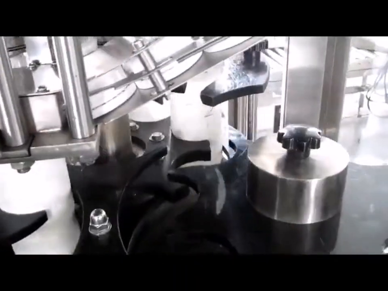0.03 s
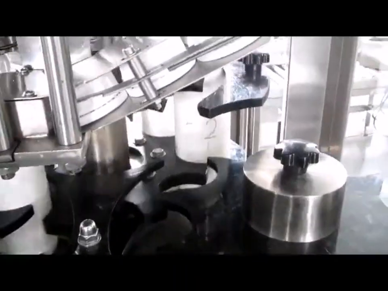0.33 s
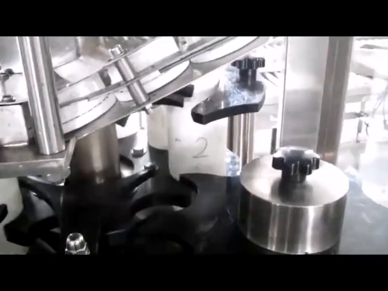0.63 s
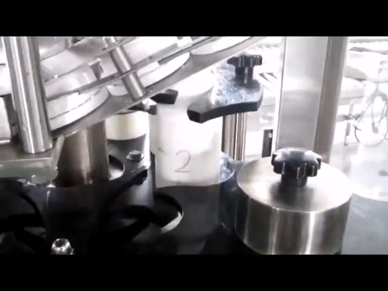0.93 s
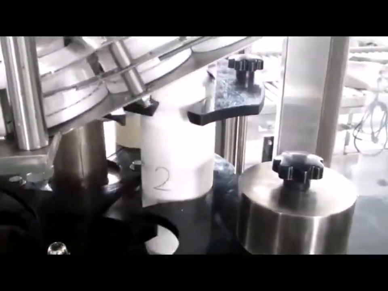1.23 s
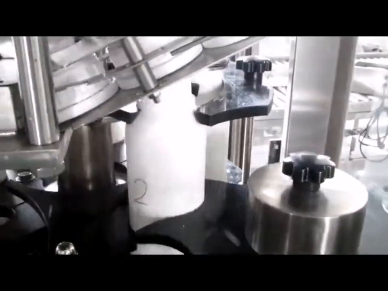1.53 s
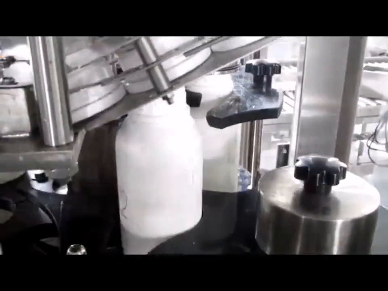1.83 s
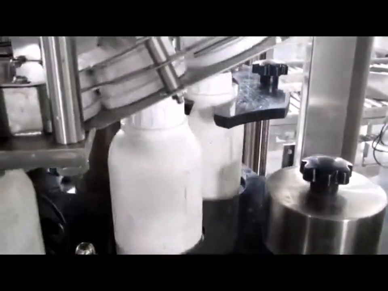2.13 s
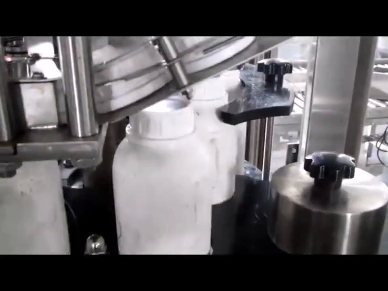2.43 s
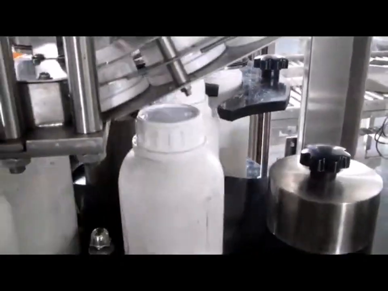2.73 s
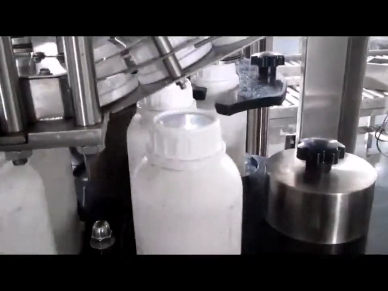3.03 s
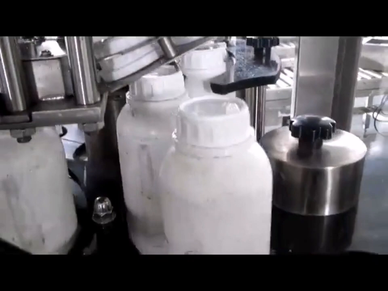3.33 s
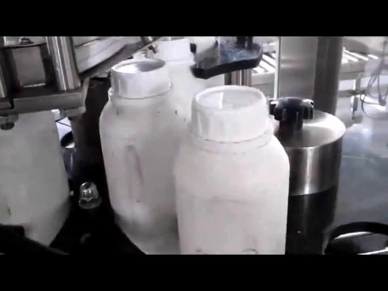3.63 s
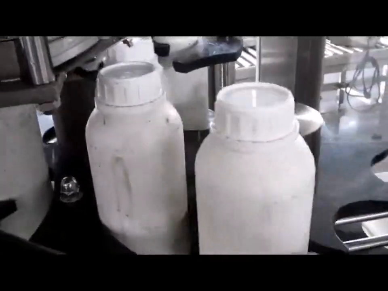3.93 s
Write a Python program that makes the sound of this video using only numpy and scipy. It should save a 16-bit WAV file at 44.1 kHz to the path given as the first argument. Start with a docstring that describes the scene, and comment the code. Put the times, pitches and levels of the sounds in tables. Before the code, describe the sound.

A bottle filling and capping machine rattles steadily up close in a factory hall. Plastic bottles clack against the guides and now and then knock hollowly, while conveyors churn and hiss underneath.

```python
"""Bottle filling and capping machine

In a factory hall a turning mechanism chatters about fifteen times a second. Each beat is a short
scrape of tiny contacts that excites the modes of the steel frame. Plastic bottles clack against
the guides and now and then boom as hollow resonators. Underneath, drive and conveyors churn,
far bottles clatter, and sliding ones hiss by friction."""
import sys
import numpy as np
from scipy import signal
from scipy.fft import rfft, irfft
from scipy.io import wavfile

SR = 44100
rng = np.random.default_rng(int(sys.argv[2]) if len(sys.argv) > 2 else 0)


def wav_out(sig):
    """Save sig, one row per channel (or a flat mono array), as 16-bit PCM at SR to the path in sys.argv[1]."""
    wavfile.write(sys.argv[1], SR, np.round(np.clip(np.atleast_2d(sig).T, -1, 1) * 32767).astype(np.int16))


N = 176400
BURST = 8192  # samples in one short sound

# Levels are relative: each source adds its own gain.
# Loudness curves of the steady sources: time_s, level_db
CHURN_LEVEL = [(0.0, -26.5), (0.43, -26.5), (0.53, -25.5), (1.22, -30), (1.54, -35), (1.96, -32.5),
               (2.27, -32), (2.64, -30), (2.86, -31.5), (3.34, -33.5), (3.72, -32.5), (4.0, -33.5)]
FAR_CLATTER_LEVEL = [(0.0, -27), (0.42, -28.5), (0.78, -25.5), (1.34, -29.5), (1.65, -27.5), (2.29, -34.5),
                     (2.72, -34.5), (3.23, -34.5), (3.35, -39), (3.64, -31.5), (3.73, -34), (3.89, -39),
                     (4.0, -31.5)]
HISS_LEVEL = [(0.0, -37), (0.43, -41), (0.73, -32), (0.89, -39), (1.01, -40.5), (1.3, -40), (1.7, -32),
              (1.94, -35), (2.12, -40), (2.24, -45), (2.47, -47), (3.26, -38), (3.4, -38.5), (3.64, -36),
              (3.7, -33.5), (4.0, -44.5)]
# Spectra of the churning and of a contact's three bands: frequency_hz, gain_db
CHURN_SPECTRUM = [(25, -12), (50, -19.5), (85, -8), (120, -17), (160, -10), (200, -4), (275, 0.5),
                  (330, -4), (490, 3.5), (530, -7.5), (590, 6), (800, 3.5), (1150, -2), (1600, -5),
                  (2500, -8.5), (3700, -13.5), (4300, -18), (8000, -30)]
LOW_SPECTRUM = [(50, -40), (110, -22), (200, -7.5), (280, -1.5), (450, 11), (620, 9.5), (1000, 8.5),
                (1400, -2.5), (2500, -51)]
MID_SPECTRUM = [(600, -37), (1100, 6), (1900, 7.5), (2900, 1.5), (3400, 2), (3950, -1), (4200, -36),
                (7000, -35)]
TREBLE_SPECTRUM = [(2800, -58), (4000, 9.5), (4500, 5.5), (5200, 11.5), (5900, 10), (6600, 3), (7400, 10.5),
                   (8000, -13)]
# Beats of the mechanism: start_s, length_s, level_db, low_db, ring_db, treble_db (last three re level)
BEATS = [(0.053, 0.0034, -24, 6, -32.5, -5.5), (0.123, 0.012, -27.5, 1, -18, -9),
         (0.191, 0.019, -32, 8.5, -10, -18), (0.317, 0.017, -25, -14.5, -29, -17),
         (0.384, 0.013, -26.5, 5.5, -11, -17), (0.579, 0.014, -24.5, 1.5, -9, -8.5),
         (0.647, 0.0072, -26.5, -9, 2.5, -19), (0.719, 0.02, -24.5, 3.5, -5.5, -11.5),
         (0.78, 0.005, -25, -7, 5, -8), (0.849, 0.0063, -25, -10, 4, -30),
         (0.909, 0.0046, -26.5, -3, 8, -27), (0.979, 0.013, -28, -9, 2.5, -7.5),
         (1.042, 0.008, -28, 4, 6, -5), (1.114, 0.0061, -31.5, 1, 5, -8),
         (1.18, 0.0099, -29, -5, 3.5, -10.5), (1.236, 0.012, -23.5, 1, -6, -7),
         (1.32, 0.0072, -27.5, -7, -2, -11), (1.377, 0.008, -23.5, -26, 2.5, -11.5),
         (1.447, 0.0052, -22.5, -2, 4, -12), (1.513, 0.0063, -21, -5.5, -4.5, -11.5),
         (1.58, 0.0064, -20.5, -20, -14, -16.5), (1.687, 0.0044, -19.5, -2, -7, -8),
         (1.748, 0.0082, -20, 0, -10, -9), (1.813, 0.0062, -23, -6, -14, -9.5),
         (1.88, 0.021, -29.5, -13, -24, -22), (1.949, 0.011, -30, -13, 0, -3.5),
         (2.018, 0.02, -23.5, -18, -11, -4), (2.444, 0.0068, -24, 9.5, -17, -8.5),
         (2.505, 0.02, -28, -5, -9, -14), (2.579, 0.01, -26, -11, -2, -11.5),
         (2.647, 0.0105, -22, -2.5, -2, -15), (2.717, 0.014, -20.5, -6, 0, -10.5),
         (2.782, 0.012, -20, -17, -0.5, -12), (2.839, 0.014, -25, -20, -10, -9.5),
         (2.913, 0.0068, -27.5, 1, 1, -1), (2.976, 0.015, -25, 0, -8, -8),
         (3.048, 0.0033, -21, 0.5, -21, -13), (3.109, 0.0079, -19, -1, -14, -13),
         (3.187, 0.0068, -21, -9, 1.5, -4.5), (3.258, 0.04, -25.5, -2.5, -6.5, -8),
         (3.329, 0.0058, -22, 3.5, -9, -32), (3.395, 0.011, -22, -17, -6.5, -16),
         (3.445, 0.027, -24, -10.5, -11, -6.5), (3.532, 0.0087, -22.5, -6, -3.5, -10),
         (3.595, 0.018, -28.5, -6, -3.5, -9), (3.664, 0.015, -25.5, -20, -8.5, -12),
         (3.731, 0.015, -23, -3, -10, -12), (3.791, 0.012, -24, 5, -13.5, -11.5),
         (3.873, 0.022, -28.5, -2, -18, -8.5), (3.943, 0.022, -32, -36, 3, -0.5)]
# Bottles striking the guides: start_s, length_s, level_db, low_db, treble_db (last two re level)
CLACKS = [(0.132,0.0094,-27,16.5,-21), (0.213,0.0037,-23.5,8,-6), (0.224,0.011,-26,13.5,-6.5),
          (0.363,0.024,-22,-1,-10), (0.388,0.011,-22,5.5,-10.5), (.618,0.012,-18,6.5,-22),
          (0.651,0.0066,-22.5,7,-7.5), (0.753,0.011,-19,5.5,-10), (0.83,0.0048,-21,-6.5,-5),
          (1.026,0.0079,-20,4,-11.5), (1.214,.005,-21.5,1.5,-11), (1.43,0.0048,-24.5,-17,-13),
          (1.492,0.0057,-22.5,2,-18.5), (1.553,0.0064,-23.5,-13,-23), (1.619,0.0069,-19.5,-21,-14),
          (2.125,0.0017,-15.5,-23,-2.5), (2.255,0.0045,-24,11,-20), (2.299,0.016,-27.5,8,-8.5),
          (2.477,0.0068,-29,12.5,-20), (2.791,0.0073,-25,3,-19), (3.12,0.014,-19,4.5,-10.5),
          (3.285,0.0025,-16,-10,-3.5), (3.421,0.0047,-26.5,1,1.5), (3.491,0.0053,-20.5,0,-3.5),
          (3.761,0.022,-21,2,-5), (3.953,0.0045,-16,-13,-7)]
# Modes of the frame and of the steel ring: pitch_hz, level_db, t60_s
FRAME_MODES = [(642, -6, 0.1), (972.5, 5, 0.068), (1317, 5, 0.095), (2002, -3, 0.064), (2780, -6.5, 0.04),
               (3020, -3, 0.023)]
RING_MODES = [(2733, -10, 0.06), (2890, -10.5, .022), (3516, -7, 0.027), (3670, -1.5, 0.042)]
# Hollow resonances of bumped bottles: start_s, pitch_hz, level_db, rise_s, t60_s
BOOMS = [(.056,1774,-13,0.0016,0.034), (.128,754,-21,.008,.12), (.226,615,-28,.008,.12),
         (.228,1110,-23,.005,.07), (.358,488,-35,.014,.14), (.392,1150,-21.5,.005,0.061),
         (0.585,341,-23,0.0093,0.16), (0.618,1180,-17.5,.003,.064), (.62,683,-26,0.0037,0.099),
         (.767,1647,-25,0.015,.084), (1.027,1600,-20.5,0.0039,0.062), (1.237,1130,-16,0.0049,.07),
         (1.24,957,-20.5,0.0099,0.15), (1.621,2840,-17,0.0026,0.042), (2.301,1150,-17.5,0.0025,.09),
         (2.312,697,-27,0.0064,0.12), (2.426,631,-20,0.016,0.19), (2.479,1180,-12.5,0.0019,0.031),
         (2.479,1580,-20,0.0043,.072), (2.481,601,-20.5,0.0087,0.21), (2.515,292,-24,0.02,0.071),
         (2.796,1568,-10.5,0.0062,0.058), (3.111,1136,-14,0.0089,0.053), (3.866,571,-14.5,.023,0.21),
         (3.89,299,-23,.014,.16), (3.895,410,-25,.014,0.11)]
# Stereo width: frequency_hz, side_gain_db
WIDTH = [(60, -26), (150, -30), (300, -25), (600, -18), (1000, -14.5), (1600, -9.5), (2800, -11.5),
         (4000, -9), (5000, -5), (7400, -3)]
# Stereo balance: frequency_hz, left_minus_right_db
LEAN = [(1400, 0), (2800, -.9), (5500, -1.5), (8000, -3)]

ATTACK_S, RELEASE_S, TAIL_DB, TAIL_S = 0.002, 0.005, -9, 0.018  # envelope of a blow
REBOUND_WAIT_S, REBOUND_DECAY_S, REBOUND_DB = 0.0056, 0.0056, -2.5
BEAT_DB, CLACK_DB = 0.5, -3
LOW_DB, MID_DB, TREBLE_DB = -7, -0.5, 0.5


def from_db(db):
    """Amplitude grows tenfold with every 20 decibels."""
    return 10 ** (np.asarray(db) / 20)


def unit_rms(x):
    """Division by the rms gives a signal unit power."""
    return x / np.sqrt(np.mean(x ** 2) + 1e-20)


def over_time(points):
    """Linear interpolation gives a curve's value at every sample."""
    return np.interp(np.arange(N) / SR, *np.transpose(points))


def per_bin(points, size):
    """Interpolation in log frequency gives a spectrum's value at every bin."""
    hz, value = np.transpose(points)
    return np.interp(np.log(np.fft.rfftfreq(size, 1 / SR) + 1), np.log(hz), value)


def body(spectrum, size=2048):
    """A minimum-phase response, here of unit energy, follows from its magnitude spectrum."""
    cepstrum = irfft(np.log(from_db(per_bin(spectrum, size))))
    cepstrum[1:size // 2] *= 2
    cepstrum[size // 2 + 1:] = 0
    response = irfft(np.exp(rfft(cepstrum)))
    return response / np.linalg.norm(response)


def through(x, response):
    """A linear system convolves its input with its impulse response."""
    return signal.fftconvolve(x, np.atleast_2d(response), axes=-1)[:, :x.shape[-1]]


def lowpass(x, cutoff_hz):
    """A second-order filter falls 12 dB an octave above its cutoff."""
    return signal.sosfilt(signal.butter(2, cutoff_hz, fs=SR, output="sos"), x)


def cut_bass(x, cutoff_hz=122):
    """Parts much smaller than a wavelength radiate poorly."""
    return signal.sosfilt(signal.butter(2, cutoff_hz, "high", fs=SR, output="sos"), x)


def mode(hz, t60):
    """A damped mode rings as an exponentially decaying sine, here of unit energy."""
    t = np.arange(BURST) / SR
    response = np.sin(2 * np.pi * hz * t) * from_db(-60 * t / t60)
    return response / np.linalg.norm(response)


def contacts(per_s, spread_db, size=N):
    """Independent tiny impacts form shot noise: a centre row and a side row, at unit rms."""
    shape = (2, size)
    strength = from_db(spread_db * np.minimum(rng.exponential(1, shape), 3))
    polarity = rng.choice([-1, 1], shape)
    return unit_rms(strength * polarity * (rng.random(shape) < per_s / SR))


def add(track, start_s, sound):
    """Sounds combine by superposition, each from its own start."""
    i = max(int(start_s * SR), 0)
    track[:, i:i + sound.shape[-1]] += sound[:, :max(N - i, 0)]


def churn(knocks_per_s=110, mode_count=24, t60_cycles=28):
    """Dense impacts of drive and conveyors merge into dull noise; jostling bottles ring hollowly."""
    grains = contacts(per_s=3000, spread_db=0)
    drive = through(grains, body(CHURN_SPECTRUM, size=8192))
    knocks = np.zeros((2, N))
    for hz in np.geomspace(253.5, 1340, mode_count):
        impacts = contacts(knocks_per_s / mode_count, spread_db=0.9)
        knocks += np.sqrt(hz) * through(impacts, mode(hz, t60_cycles / hz))
    jostling = from_db(-5) * cut_bass(unit_rms(knocks))
    return from_db(over_time(CHURN_LEVEL) + 0.5) * (drive + jostling)


def far_clatter():
    """Collisions of far bottles add up to a fine, gritty shot noise."""
    grains = contacts(per_s=1200, spread_db=1.5)
    return from_db(over_time(FAR_CLATTER_LEVEL) - 3.5) * through(grains, body(MID_SPECTRUM))


def sliding_hiss(flutter_db=4):
    """Sliding friction of bottles makes treble noise of uneven strength."""
    flutter = unit_rms(lowpass(rng.standard_normal(N), cutoff_hz=25))
    friction = through(rng.standard_normal((2, N)), body(TREBLE_SPECTRUM))
    return from_db(over_time(HISS_LEVEL) - 5.5 + flutter_db * flutter) * friction


def ticks(per_s=22, length_s=0.0063, level_db=-35.5, low_db=-2.5, treble_db=-16.5, slots=400):
    """Loose small parts tick as a random process, listed here as faint blows."""
    draws = rng.random((slots, 2))
    scatter_db = 2 * rng.standard_normal(slots)
    return [(when * N / SR, length_s, level_db - drop_db, low_db, 0, treble_db)
            for (when, chance), drop_db in zip(draws, scatter_db) if chance < per_s * N / SR / slots]


def scrape(length_s, rebounds=2, cluster_db=0.5):
    """A blow is a burst of clustered contacts; its inelastic rebounds grow weaker in turn."""
    t = np.arange(BURST) / SR
    after = np.maximum(t - length_s, 0)
    decay = np.maximum(np.exp(-after / RELEASE_S), from_db(TAIL_DB) * np.exp(-after / TAIL_S))
    envelope = np.minimum(t / ATTACK_S, 1) * decay
    waits_s = REBOUND_WAIT_S * (0.5 + rng.random(rebounds))
    for k, touch_s in enumerate(length_s + np.cumsum(waits_s), 1):
        rebound = from_db(k * REBOUND_DB) * (t > touch_s) * np.exp(-abs(t - touch_s) / REBOUND_DECAY_S)
        envelope = np.maximum(envelope, rebound)
    clusters = unit_rms(lowpass(rng.standard_normal(BURST), cutoff_hz=130))
    burst = contacts(per_s=3500, spread_db=2, size=BURST) * envelope * from_db(cluster_db * clusters)
    return burst * np.linalg.norm(envelope) / (np.linalg.norm(burst, axis=1, keepdims=True) + 1e-9)


def frame(gain_db=-18, spread_db=4, pitch_spread=0.06):
    """The frame's modal response varies in pitch and strength with the point struck."""
    draws = rng.standard_normal((len(FRAME_MODES), 2))
    return sum(from_db(db + gain_db + spread_db * strength) * mode(hz * (1 + pitch_spread * shift), t60)
               for (hz, db, t60), (strength, shift) in zip(FRAME_MODES, draws))


def small_parts(count=4, low_hz=893, high_hz=3205, t60_s=0.041):
    """Small parts caught by a blow vibrate at their own natural frequencies."""
    pitches = low_hz * (high_hz / low_hz) ** rng.random(count)
    return from_db(-10) * sum(mode(hz, t60_s) for hz in pitches)


def steel_ring(gain_db=-1.5, spread_hz=45):
    """The ring's inharmonic modes chink, a little differently at each touch."""
    return sum(from_db(db + gain_db) * mode(hz + spread_hz * rng.standard_normal(), t60)
               for hz, db, t60 in RING_MODES)


def rattle(touches=3):
    """Impact excitation: beats, clacks and ticks drive frame and parts; beats also touch the ring."""
    low, mid, treble, ringing = np.zeros((4, 2, N))
    blows = [(start_s, length_s, db + BEAT_DB, low_db, from_db(ring_db), treble_db)
             for start_s, length_s, db, low_db, ring_db, treble_db in BEATS]
    blows += [(start_s, length_s, db + CLACK_DB, low_db, 0, treble_db)
              for start_s, length_s, db, low_db, treble_db in CLACKS]
    for start_s, length_s, db, low_db, ring_gain, treble_db in blows + ticks():
        burst = from_db(db) * scrape(length_s)
        add(low, start_s, burst * from_db(low_db + LOW_DB))
        add(mid, start_s, burst * from_db(MID_DB))
        add(treble, start_s, burst * from_db(treble_db + TREBLE_DB))
        add(ringing, start_s, through(burst, frame() + small_parts()))
        touch_gain = ring_gain * np.linalg.norm(burst[0]) / np.sqrt(touches)
        for lag_s in ATTACK_S + length_s * (np.arange(touches) + rng.random(touches) / 2) / touches:
            add(ringing[:1], start_s + lag_s, touch_gain * steel_ring()[None])
    return (through(low, body(LOW_SPECTRUM)) + through(mid, body(MID_SPECTRUM))
            + through(treble, body(TREBLE_SPECTRUM)) + ringing)


def bottle_booms(glide_per_s=0.26, scuff_gain=0.4):
    """A bump excites one hollow resonance, which swells, rises slightly in pitch and decays."""
    track = np.zeros((2, N))
    t = np.arange(BURST) / SR
    for start_s, hz, db, rise_s, t60 in BOOMS:
        envelope = np.minimum(t / rise_s, 1) ** 2 * from_db(-60 * np.maximum(t - rise_s, 0) / t60)
        cavity = mode(hz, t60=0.018)
        noise = rng.standard_normal((1, BURST))
        scuff = unit_rms(through(through(noise, cavity), cavity))  # makes the tone waver
        cycles = hz * t * (1 + glide_per_s * t / 2)
        tone = np.sin(2 * np.pi * (cycles + rng.random()))
        add(track[:1], start_s, from_db(db) * envelope * (tone + scuff_gain * scuff))  # centre only
    return track


def hall(x, t60_s=0.21, build_s=0.0052, gain_db=-10):
    """Diffuse reflections form a dull reverberant tail that decays exponentially."""
    t = np.arange(SR) / SR
    tail = rng.standard_normal((2, SR)) * from_db(-60 * t / t60_s) * np.minimum(t / build_s, 1)
    tail /= np.linalg.norm(tail, axis=1, keepdims=True)
    return from_db(gain_db) * through(x, lowpass(tail, cutoff_hz=3100))


def scene():
    """Sum and difference give stereo: narrow in the bass, wide and slightly right in the treble."""
    near = cut_bass(rattle() + bottle_booms())
    centre, side = rfft(near + hall(near) + churn() + far_clatter() + sliding_hiss())
    side = side * from_db(per_bin(WIDTH, N))
    lean = from_db(per_bin(LEAN, N) / 2)
    return irfft(np.array([(centre + side) * lean, (centre - side) / lean]), N)


def record(dry, saturation=0.93, cutoff_hz=7750):
    """Soft saturation rounds the hardest peaks; a steep low-pass filter removes the top."""
    rounded = saturation * np.tanh(dry / saturation)
    return signal.sosfilt(signal.ellip(12, 0.2, 70, cutoff_hz, fs=SR, output="sos"), rounded)


dry = scene()
out = record(dry)
wav_out(out)
```